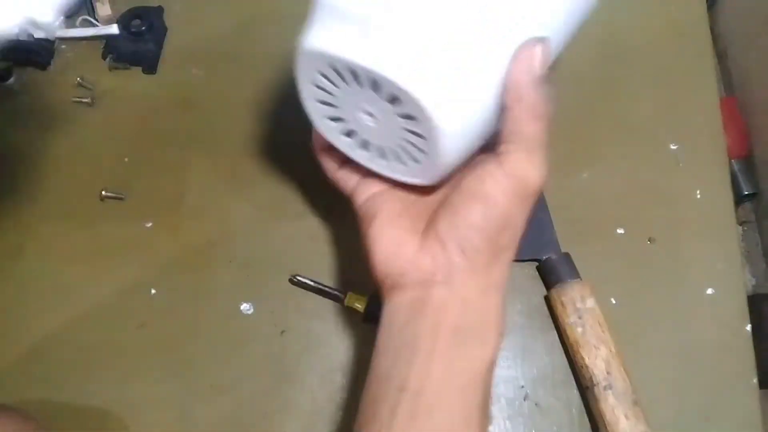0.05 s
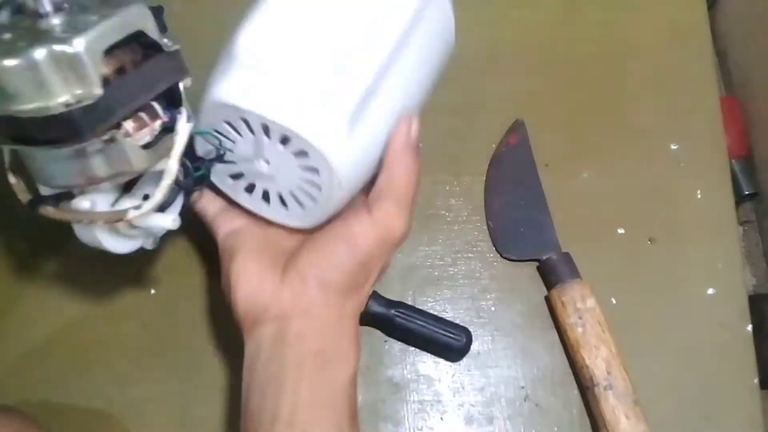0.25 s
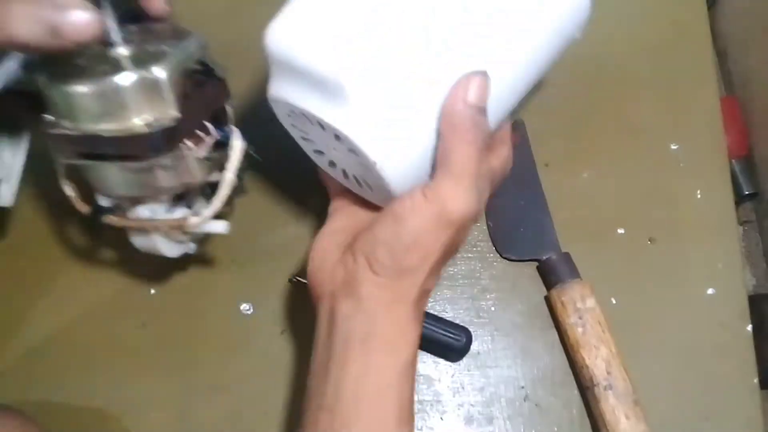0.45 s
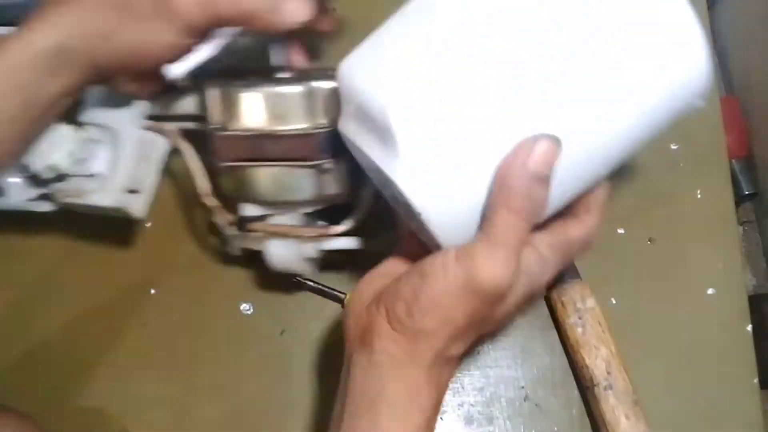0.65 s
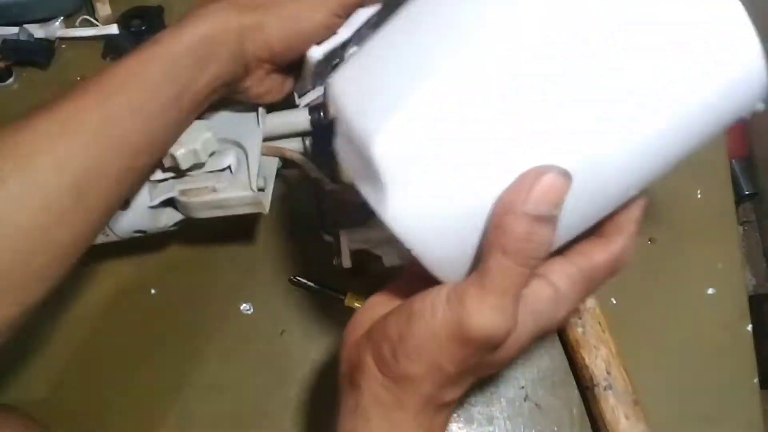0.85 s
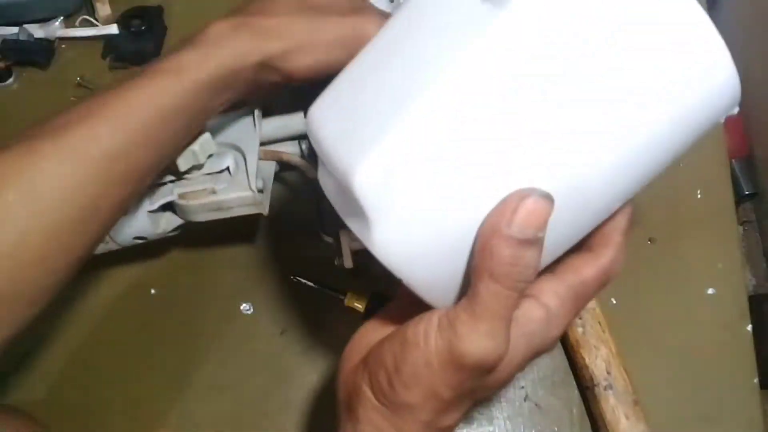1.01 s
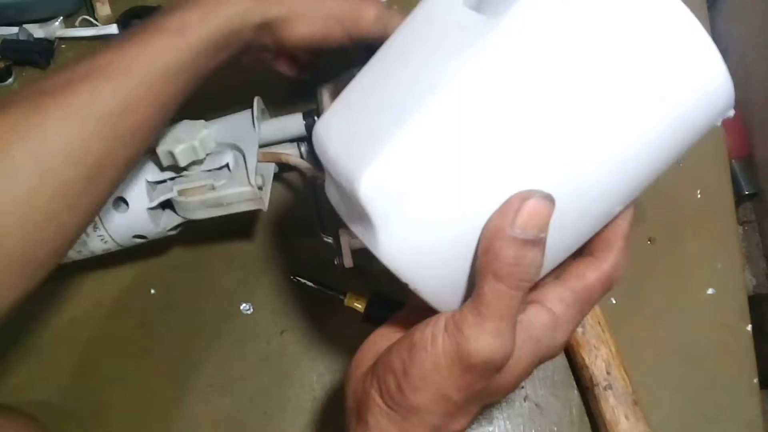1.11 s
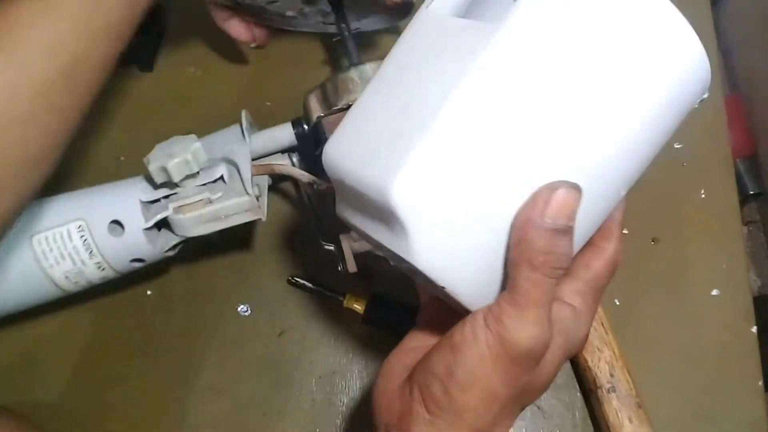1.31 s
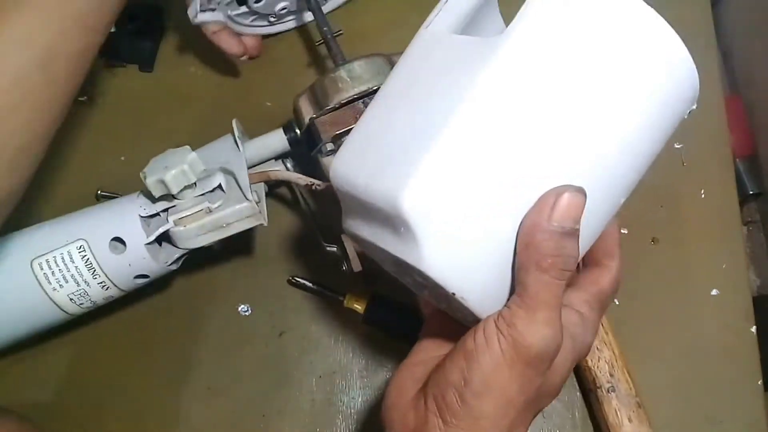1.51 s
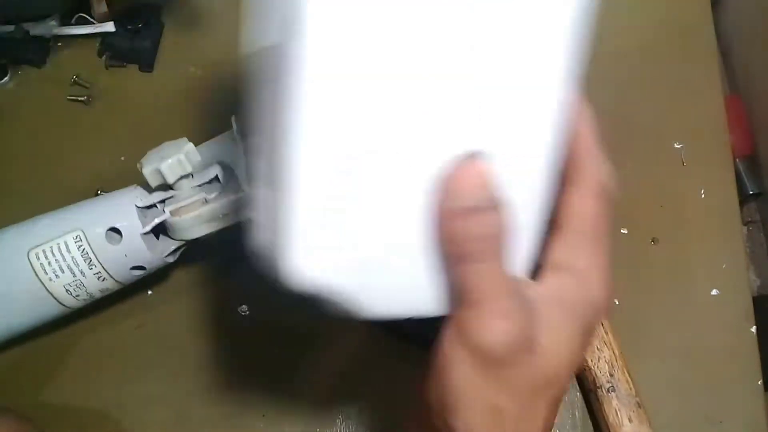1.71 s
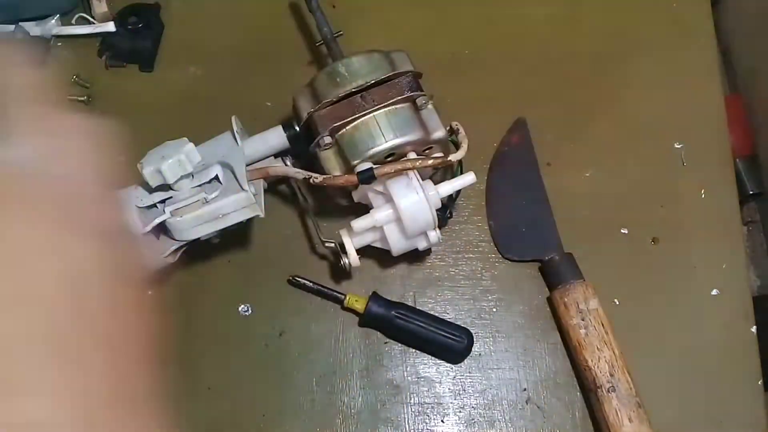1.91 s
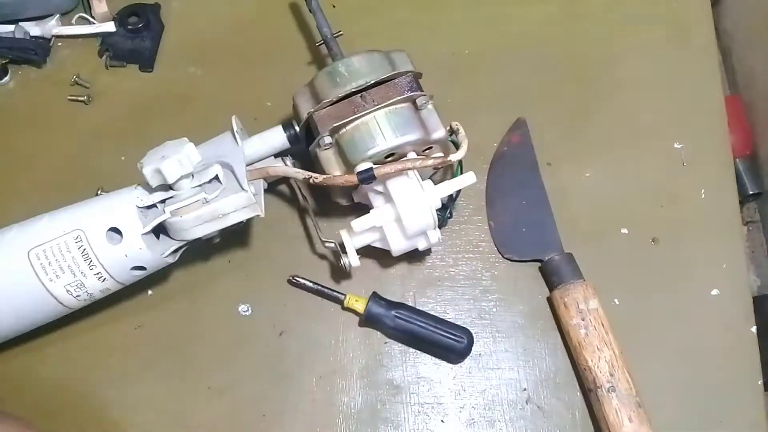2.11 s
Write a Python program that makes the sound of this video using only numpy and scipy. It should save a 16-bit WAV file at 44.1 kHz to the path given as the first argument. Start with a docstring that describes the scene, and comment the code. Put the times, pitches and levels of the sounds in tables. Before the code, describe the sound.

Hard plastic fan housing knocks and clatters against a heavy motor on a thin wooden bench

```python
"""A plastic fan housing and a heavy motor are picked up, knocked together and set down on a thin wooden bench.
Every knock is a short push that rings damped modes of walls, bench, hollow and contact. Between knocks
the parts drag and rattle: random slips ring the same modes. A bare room answers with dense echoes, over
low air noise and a faint whine. Early on the echo of a hit, cut in abruptly after the hit itself, dies away
as coloured noise. The loudest blows overload a phone microphone."""
import sys
import numpy as np
from scipy import signal
from scipy.io import wavfile

SR = 44100
rng = np.random.default_rng(int(sys.argv[2]) if len(sys.argv) > 2 else 0)


def master_out(mix):
    """Clip the mix to full scale and print it as 16-bit PCM to the path in sys.argv[1]."""
    frames = np.transpose(np.atleast_2d(mix))
    ceiling = np.clip(frames, -1, 1)
    pcm = np.round(ceiling * 32767).astype(np.int16)
    wavfile.write(sys.argv[1], SR, pcm)


def makeup_ratio(level_db):
    """Linear amplitude ratio for a level in decibels (20 dB per factor of ten)."""
    decades = np.asarray(level_db, float) / 20
    return 10 ** decades


N = 94815
WALLS, BENCH, HOLLOW, CONTACT = range(4)   # the sounding bodies, in the order of all level columns

# dragging and rattling, one list for each move: (t/s, relative wall rattle/dB, bench rumble/dB,
# hollow buzz/dB, contact scrape/dB, pitch of the rumble f/Hz, pitch of the hollow f/Hz)
DRAG_MOVES = [
    [(0.214, -7.5, 1, -24, -28, 239, 852), (0.228, -30, -18, -17, -30, 229, 795)],
    [(0.243, -13, -11, -13, -37, 250, 935), (0.273, -21, -17.5, -11.5, -27, 247, 940),
     (0.297, -25.5, -15, -22, -38.5, 239, 913)],
    [(0.317, -25.5, -7, -18, -35, 223, 916), (0.344, -29, -19, -29.5, -43, 229, 860)],
    [(0.363, -28, -47, -15, -45, 204, 825), (0.387, -37.5, -27, -21.5, -49, 222, 810),
     (0.417, -38.5, -34, -29.5, -56, 242, 870), (0.497, -58, -41, -38, -69, 219, 820),
     (0.549, -78, -67, -47.5, -79, 214, 805), (0.57, -51, -40, -66, -74.5, 233, 841)],
    [(0.589, -27, -45, -30, -50, 222, 914), (0.612, -25, -18.5, -15, -51, 246, 987),
     (0.635, -34, -29, -24, -52, 243, 975), (0.658, -36, -28, -27, -53, 227, 916),
     (0.708, -39, -30, -38, -57, 202, 790), (0.74, -34.5, -27.5, -38.5, -53, 245, 786),
     (0.802, -34.5, -28.5, -42, -47.5, 219, 813), (0.846, -31.5, -21.5, -31.5, -43.5, 193, 850),
     (0.9, -42.5, -27, -49, -56.5, 140, 800)],
    [(0.92, -42.5, -42, -41.5, -55, 190, 790), (1.008, -51.5, -42.5, -52.5, -60.5, 218, 760),
     (1.022, -54, -68, -59.5, -69.5, 213, 750), (1.042, -58, -41.5, -50.5, -63.5, 210, 740),
     (1.074, -65, -50, -73, -66, 207, 740), (1.13, -57.5, -34, -83.5, -82, 182, 785),
     (1.156, -73, -66, -73, -93, 179, 740), (1.165, -72, -49, -71, -82, 174.5, 730)],
    [(1.18, -55, -36, -50, -86, 216, 778), (1.195, -56.5, -34, -54, -65, 218, 781)],
    [(1.213, -27.5, -16.5, -31, -40.5, 181, 841), (1.239, -32.5, -26.5, -31, -43, 210, 835),
     (1.245, -28.5, -17.5, -48, -35, 224, 836), (1.259, -31, -22.5, -40, -44.5, 218, 837),
     (1.371, -49, -36, -47, -61.5, 185, 762), (1.405, -38.5, -18.5, -32.5, -52, 174, 736),
     (1.439, -45, -34, -42, -56, 204, 728), (1.453, -26, -29, -35, -50, 219, 736)],
    [(1.47, -28, -19, -35, -43, 192, 846), (1.554, -44, -31, -42.5, -58, 197, 905),
     (1.572, -43.5, -25.5, -53, -59, 194, 957), (1.638, -51, -32.5, -42, -66, 211, 820),
     (1.654, -42.5, -25.5, -48, -65, 198, 870), (1.7, -43.5, -35, -39, -57.5, 200, 830),
     (1.768, -58.5, -24, -47, -93, 176, 836), (1.84, -54, -45, -49, -82, 187, 865)],
    [(1.874, -45, -53, -67, -63, 239, 886), (1.882, -33, -69, -23, -47.5, 236, 920),
     (1.908, -41, -44, -29.5, -55, 232, 905), (1.928, -44, -58.5, -22.5, -53, 250, 870),
     (1.944, -26, -35, -34, -44.5, 349, 841), (1.965, -32.5, -41, -25, -48, 330, 780),
     (1.988, -38.5, -75, -32, -55, 290, 818), (2.0, -40.5, -66, -29, -55, 310, 862)],
    [(2.02, -35, -22, -34, -60, 287, 856), (2.028, -34, -78, -34, -56, 291, 848),
     (2.048, -48, -59, -37, -61, 242, 848), (2.072, -41.5, -70, -43, -72, 209, 804),
     (2.092, -55, -76, -45, -61, 241, 804)],
    [(2.097, -45, -46, -37, -65, 282, 800), (2.122, -42, -55, -27.5, -57, 291, 760),
     (2.15, -37, -37.5, -40, -55, 258, 750)],
]
# echo of the bare room: (f/Hz, level/dB, t60/s)
ROOM_ECHO = [(88.5, -23, 1), (250, -8, 0.45), (800, -28, 0.28), (2600, -6.5, 0.41), (5900, -12, 0.29),
             (14000, -32, 0.17)]
ROOM_BUILD_S = 0.0084


def rms_one(x):
    """Scales a sound to unit rms."""
    return x / np.sqrt(np.mean(x ** 2) + 1e-20)


def at_hz(points, hz, axis=1):
    """Reads a table column at a frequency, interpolating on a log scale."""
    points = np.array(points)
    return np.interp(np.log(hz), np.log(points[:, 0]), points[:, axis])


def bands(size):
    """Half-octave noise bands, each with its centre; neighbours come from separate noises."""
    white = rng.standard_normal((2, size))
    edges_hz = 25 * 2 ** np.arange(0, 9.4, .5)
    out = []
    for k, (lo, hi) in enumerate(zip(edges_hz, edges_hz[1:])):
        band_pass = signal.butter(2, [lo, hi], "band", fs=SR, output="sos")
        out.append((np.sqrt(lo * hi), signal.sosfilt(band_pass, white[k % 2])))
    return out


def room_tone():
    """Low steady air, as noise coloured band by band, and a thin sine whine."""
    # colour of the air: (f/Hz, relative level per Hz/dB)
    air_colour = [(15, -28), (25, -2), (340, -2), (1660, -31.5), (4260, -35.5), (5730, -68.5),
                  (6210, -36.5), (9810, -40), (15500, -51)]
    air_db, whine_hz, whine_db = -48.5, 6300, -81.5
    air = rms_one(sum(makeup_ratio(at_hz(air_colour, hz)) * band for hz, band in bands(N)))
    whine = np.sin(2 * np.pi * whine_hz * np.arange(N) / SR)
    return makeup_ratio(air_db) * air + makeup_ratio(whine_db) * whine


def cut_in_echo():
    """The echo of a hit, cut in abruptly after the hit itself: noise dying band by band."""
    # where the echo cuts in: (t/s, level/dB)
    cut_ins = [(0.056, -29.5)]
    # colour of the echo: (f/Hz, relative level per Hz/dB)
    echo_colour = [(59, -53.5), (100, -19), (248, 2), (1160, -8.5), (1260, -10), (1490, -1.5),
                   (2370, -12.5), (15500, -19)]
    out, noise = 0, bands(N)
    for start_s, db in cut_ins:
        t = np.maximum(np.arange(N) / SR - start_s, 0)
        tail = 0
        for hz, band in noise:
            fade_db = 60 * t / at_hz(ROOM_ECHO, hz, axis=2)
            tail = tail + makeup_ratio(at_hz(echo_colour, hz) - fade_db) * band
        first = int(start_s * SR)
        tail = tail / np.std(tail[first:first + 2000])   # level is set at the start of the echo
        out = out + makeup_ratio(db) * (1 - np.exp(-t / ROOM_BUILD_S)) * tail
    return out


def ring(clicks, hz, t60):
    """A unit click sets a damped sine of initial height 1 ringing."""
    r, w = makeup_ratio(-60 / (t60 * SR)), 2 * np.pi * hz / SR
    return signal.lfilter([0, np.sin(w)], [1, -2 * r * np.cos(w), r * r], clicks + 1e-18)


def grip(body, hz, bench_hz, hollow_hz, wall_hz=None):
    """Load and grip move the pitches; bench, hollow and struck walls favour modes near theirs."""
    if wall_hz is None:
        wall_hz = hz
    # loss one octave from the pitch, in dB; the contact has none
    fall_db, pitch_hz = ((3.5, wall_hz), (4.5, bench_hz), (63, hollow_hz), (0, hz))[body]
    return makeup_ratio(-fall_db * np.abs(np.log2(hz / pitch_hz)) ** 1.5)


def soften(x, body):
    """Each body radiates mainly in its own range."""
    # range of walls, bench, hollow, contact: (lowest f/Hz, highest f/Hz)
    pass_hz = [(840, 3300), (135, 680), (531, 1910), (4030, 11400)]
    return signal.sosfilt(signal.butter(2, pass_hz[body], "band", fs=SR, output="sos"), x)


def push(body, hollow_hz, thump_db):
    """What one blow does to a body: a burst of touches, a single thump or a swing of air."""
    t = np.arange(600) / SR
    if body == BENCH:
        press_s = 0.0012 * makeup_ratio(-0.19 * thump_db)   # weaker blows press longer
        return -np.sin(np.pi * np.minimum(t / press_s, 1)) ** 2 * 2 / (press_s * SR)
    if body == HOLLOW:
        swing_s = 0.0039   # the air swings up and down again
        swell = np.sin(np.pi * np.minimum(t / swing_s, 1)) ** 2
        return swell * np.sin(2 * np.pi * hollow_hz * t) * 4 / (swing_s * SR)
    chatter_s = 0.0024   # decay time of the touches on the hard parts
    return np.exp(-t / chatter_s) * rng.standard_normal(len(t)) / np.sqrt(chatter_s * SR / 2)


def struck(modes, body):
    """Each knock strikes every mode of a body with a strength of its own."""
    # knocks: (t/s, relative wall clack/dB, bench thump/dB, hollow ring/dB, contact tick/dB,
    # pitch of the thump f/Hz, pitch of the hollow f/Hz, centre of the clack f/Hz)
    knocks = [(0.2062,-3,-2,-11,-17,248,810,3500), (0.2366,2,-9,-2,-15,240,1050,3400),
              (0.248,-9,-7.5,-21,-27,229,890,2000), (0.2665,-12,-14,-12,-34,300,1000,2800),
              (0.3084,-7,-3,-16,-22,300,836,1800), (0.3532, -27, -24, -3.5, -36, 200, 844, 2200),
              (0.5874,-24,-8,-28,-52,270,850,2200), (0.7952,-29,-26,-38,-38.5,283,703,3800),
              (0.82,-29,-14,-26,-44,277,780,1600), (0.8422,-29,-8,-26,-48.5,125,1050,1600),
              (0.8606,-26,-17,-30.5,-55,120,700,2200), (1.1237,-48,-33,-53.5,-69.5,145,796,2000),
              (1.1762,-52,-26,-45,-64,288,729,2000), (1.2080,-23,-17,-29,-40,191,760,2000),
              (1.2442,-27,-24.5,-39,-37.5,253,840,3000), (1.3910,-37,-22,-36,-58,145,730,2000),
              (1.4612,-13,-7,-22,-33,220,900,2700), (1.5755,-33,-23,-29,-69,183,1040,1300),
              (1.6077,-42,-25,-39,-69,205,930,1300), (1.6504,-36,-29,-32,-64,178,790,1500),
              (1.7240,-41,-26,-34,-68,215,750,1800), (1.7667,-55,-23.5,-39,-77,186,880,1300),
              (1.8002,-48,-29,-40.5,-83,183,764,2000), (1.8561, -30, -28, -14.5, -58, 350, 965, 2300),
              (1.8622, -38, -32, -14, -56, 315, 930, 2300), (2.0116, -21, -32, -38, -51, 347, 920, 2800)]
    # gain of all knocks on walls, bench, hollow, contact: (level/dB)
    knock_db = (1.9, 6.8, 4, 6.5)
    spread_db = 1   # each blow lands on another spot
    force = np.zeros((len(modes), N + 600))
    hz, mode_db, _ = np.transpose(modes)
    for start_s, *db, bench_hz, hollow_hz, wall_hz in knocks:
        strength_db = db[body] + mode_db + spread_db * rng.standard_normal(len(modes))
        share = makeup_ratio(strength_db) * grip(body, hz, bench_hz, hollow_hz, wall_hz)
        first = int(start_s * SR)
        force[:, first:first + 600] += np.outer(share, push(body, hollow_hz, db[BENCH]))
    out = sum(ring(f[:N], hz, t60) for f, (hz, _, t60) in zip(force, modes))
    return makeup_ratio(knock_db[body]) * soften(out, body) / np.sqrt(len(modes))


def along(column, before):
    """A drag column in time; each move holds its last value until the next begins."""
    t, out = np.arange(N) / SR, np.full(N, before, float)
    for move in map(np.array, DRAG_MOVES):
        begun = t >= move[0, 0]
        out[begun] = np.interp(t, move[:, 0], move[:, column])[begun]
    return out


def lean(body, hz, bench_hz):
    """Dragged walls favour the rattle of each move; a dragged bench keeps close to its pitch."""
    # centre of the wall rattle in each move: (f/Hz)
    rattle_hz = (3000, 3020, 2850, 2410, 1620, 2000, 2000, 1960, 1660, 2540, 2510, 2200)
    if body == WALLS:
        starts_s = [move[0][0] for move in DRAG_MOVES]
        move_now = np.maximum(np.searchsorted(starts_s, np.arange(N) / SR) - 1, 0)
        return makeup_ratio(-3 * np.log2(hz / np.take(rattle_hz, move_now)) ** 2)   # -3 dB at one octave
    if body == BENCH:
        return makeup_ratio(-7.5 * np.abs(np.log2(hz / bench_hz)))   # on top of the loss in grip()
    return 1


def dragged(modes, body):
    """Uneven slips, dealt at random to the modes of a body, follow the drag."""
    # mean rate of slips on walls, bench, hollow, contact: (slips per second)
    slips_per_s = (6480, 1529, 2840, 9300)
    # gain of the drag on walls, bench, hollow, contact: (level/dB)
    drag_db = (-1.32, 1, -2.5, -1.67)
    level_db = along(body + 1, before=-83.0)
    bench_hz, hollow_hz = along(5, before=240), along(6, before=300)
    size = makeup_ratio(3 * np.minimum(rng.exponential(1, N), 4))   # some slips are up to 12 dB stronger
    slips = size * rng.choice([-1, 1], N) * (rng.random(N) < slips_per_s[body] / SR)
    dealt = rng.integers(0, len(modes), N)

    def ring_modes(x):
        """Every mode rings with the slips dealt to it."""
        out = 0
        for k, (hz, db, t60) in enumerate(modes):
            weight = lean(body, hz, bench_hz) * grip(body, hz, bench_hz, hollow_hz)
            out = out + makeup_ratio(db) * ring(x * (dealt == k) * weight, hz, t60)
        return out

    moving = ring_modes(slips * makeup_ratio(level_db + drag_db[body]))
    return soften(moving, body) / np.std(ring_modes(slips))   # relative to an even drag


def room(x):
    """Dense echoes that build up fast and die band by band."""
    t = np.arange(SR // 2) / SR
    echo = 0
    for hz, band in bands(len(t)):
        t60 = at_hz(ROOM_ECHO, hz, axis=2)
        fade = makeup_ratio(at_hz(ROOM_ECHO, hz) - 60 * t / t60)
        echo = echo + fade / np.sqrt(t60 * SR / 14) * band   # evens out long and short tails
    build_up = 1 - np.exp(-(t / ROOM_BUILD_S) ** 2)
    return signal.fftconvolve(x, echo * build_up)[:N]


def scene():
    """Knocked and dragged parts on the bench, their echo, the cut-in echo and the room tone."""
    # modes of the housing walls: (f/Hz, relative level/dB, t60/s)
    wall_modes = [(1210, 4, 0.018), (1358, 3, 0.017), (1614, 8, 0.0071), (1890, -2, 0.013),
                  (2182, 3, 0.011), (2403, 1.5, 0.006), (2740, -4, 0.013), (3070, 1, 0.0052),
                  (3570, 1.5, 0.0075), (4000, 2, 0.0086), (4390, -13, 0.022)]
    # modes of the wooden bench: (f/Hz, relative level/dB, t60/s)
    bench_modes = [(69.4, -12.5, 0.088), (110, -9, 0.096), (140, -10, 0.15), (185, -6, 0.084),
                   (210, -2, 0.027), (244, 1.5, 0.045), (305, -23, 0.16), (370.7, -0.5, 0.035),
                   (456.6, -0.5, 0.038)]
    # modes of the hollow housing: (f/Hz, relative level/dB, t60/s)
    hollow_modes = [(592, 7, 0.099), (653, 1, 0.14), (700, 7.5, 0.041), (781, 2.5, 0.038), (839, 4, 0.047),
                    (916, -0.5, 0.068), (964, 9, 0.022), (1047, -3.5, 0.029), (1090, -5, 0.061)]
    # modes of the ticking contact: (f/Hz, relative level/dB, t60/s)
    contact_modes = [(4430, 14, 0.0017), (5830, 7.5, 0.0018), (6980, 2.5, 0.0024), (8200, 5.5, 0.0012),
                     (10020, 4.5, 0.0014), (11200, -3, 0.0027), (12800, -4.5, 0.0053),
                     (14300, -0.5, 0.0034)]
    parts = 0
    for body, modes in enumerate((wall_modes, bench_modes, hollow_modes, contact_modes)):
        parts = parts + struck(modes, body) + dragged(modes, body)
    return (parts + room(parts) + cut_in_echo() + room_tone())[None]


def top_cut(x):
    """Nothing passes above the cut-off."""
    return signal.sosfilt(signal.butter(12, 16070, fs=SR, output="sos"), x)


def record(dry):
    """The phone microphone overloads: loud blows bend smoothly, then clip at full scale."""
    bend = 1.5   # level the smooth bend approaches; full scale is 1
    overloaded = np.clip(bend * np.tanh(dry / bend), -1, 1)
    return top_cut(overloaded)


dry = scene()
out = record(dry)
master_out(out)
```